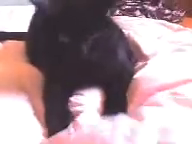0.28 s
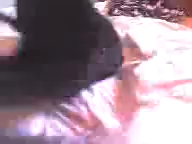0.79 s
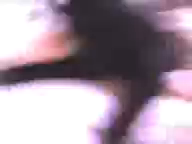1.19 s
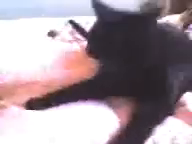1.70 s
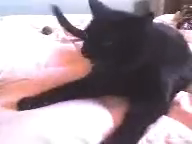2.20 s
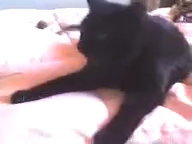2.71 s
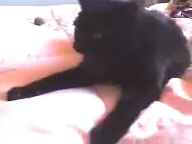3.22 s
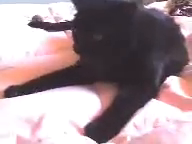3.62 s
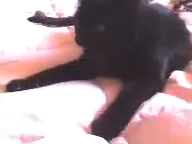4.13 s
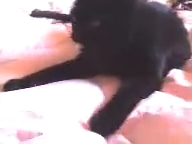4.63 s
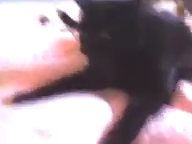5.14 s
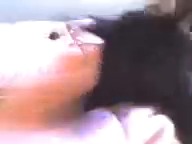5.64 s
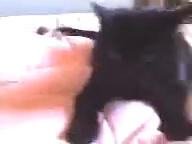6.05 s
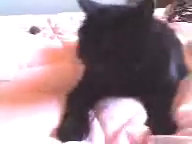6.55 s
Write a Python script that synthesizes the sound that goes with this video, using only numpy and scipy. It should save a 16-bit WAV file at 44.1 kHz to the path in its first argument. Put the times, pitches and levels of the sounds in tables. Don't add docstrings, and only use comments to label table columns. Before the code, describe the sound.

Quiet cat mutter, paw thumps on a bed, sudden harsh scream, claw snaps and hiss, then a long chest growl ending in a short yowl.

```python
import sys
import numpy as np
from scipy import signal
from scipy.fft import rfft, irfft
from scipy.io import wavfile
from scipy.ndimage import uniform_filter1d

SR = 44100
rng = np.random.default_rng(int(sys.argv[2]) if len(sys.argv) > 2 else 0)


def boost(x):
    u = np.asarray(x, float) / 20
    return 10 ** u


def digitize_waveform(pressure):
    field = np.atleast_2d(pressure).T
    bounded = np.clip(field, -1, 1)
    quanta = np.round(bounded * 32767).astype(np.int16)
    wavfile.write(sys.argv[1], SR, quanta)


N = 298557


def evened(x):
    return x / np.sqrt(np.mean(x ** 2) + 1e-20)


def smoothed(x, size):
    return uniform_filter1d(x, size=size)


def levelled(x, size=3000):
    power = smoothed(smoothed(x ** 2, size), size)
    return x / np.sqrt(abs(power) + 1e-12)


def colour(x, points):
    f, db = np.transpose(points)
    hz = np.fft.rfftfreq(len(x), 1 / SR)
    gain = boost(np.interp(np.log(hz + 1), np.log(f), db))
    return irfft(rfft(x) * gain, len(x))


def resonate(x, hz, width):
    turn = np.exp(2j * np.pi * np.cumsum(hz * np.ones(len(x))) / SR)
    r = np.exp(-np.pi * width / SR)
    smooth = signal.lfilter([(1 - r) ** 2], [1, -2 * r, r * r], x / turn + 1e-18)
    return 2 * (turn * smooth).real


def unfold(rows):
    s, *columns = np.transpose(rows)
    span = slice(max(round(s[0] * SR), 0), min(round(s[-1] * SR), N))
    t = np.arange(N)[span] / SR
    return span, t, [np.interp(t, s, c) for c in columns]


def by_jaw(table, jaw):
    opening, *columns = np.transpose(table)
    return [np.interp(jaw, opening, c) for c in columns]


# t/s, half length/s, added unevenness/1, added share of air/1
FOLD_STRAIN = [
    (1.075, .045, .09, .28),
    (1.16, .04, -.025, -.03),
    (3.45, .04, .2, .12),
    (3.7, .2, -.05, .02),
    (4.45, .2, .05, .03),
    (4.9, .15, .03, .02),
    (5.6, .07, .12, .06),
    (5.95, .05, .05, .45),
]


def vocal_folds(t, hz, folds, shimmer_db):
    s, half, *added = np.transpose(FOLD_STRAIN)
    moments = np.exp(-((t - s[:, None]) / half[:, None]) ** 4)
    uneven, air = np.array(folds)[:, None] + added @ moments
    wobble, strength, breath = rng.standard_normal((3, len(t)))
    drift = 1 + .012 * evened(smoothed(smoothed(strength, 2500), 2500))
    jitter = np.maximum(1 + uneven * evened(smoothed(wobble, 300)), .3)
    turns = np.cumsum(hz * drift * jitter) / SR
    closures = np.diff(np.floor(turns), prepend=0) > 0
    pulses = evened(closures * boost(shimmer_db * np.clip(strength, -1.6, 1.6)))
    puffs = evened((1.0 + np.exp(-(turns % 1) / .5)) * breath)
    slap = boost(1.2 * np.clip(evened(smoothed(breath, 200)), -2, 2))
    low = (1 - air) * pulses + .7 * air * puffs
    bright = (1 - air) * pulses * slap + 5.0 * air * puffs
    return low, bright, puffs


# f/Hz, level/dB
THROAT = [(440, -3), (520, -13), (680, -26), (1500, -44)]
# levels/dB (chest, first, second, third), tunings f/Hz (first, second, third)
TONGUE_LIFT = (-.5, -12, 8, -5.5), (-130, -57.5, 180)


def voice(rows, share, shape, folds, chest_hz, widths, top_db, spray_db, shimmer_db, lifts=TONGUE_LIFT):
    span, t, (effort_db, hz, jaw, tongue) = unfold(rows)
    levels = zip(by_jaw(share, jaw), lifts[0])
    chest_db, *mouth_db = (effort_db + c + lift * tongue for c, lift in levels)
    mouth_hz = [c + lift * tongue for c, lift in zip(by_jaw(shape, jaw), lifts[1])]
    low, bright, puffs = vocal_folds(t, hz, folds, shimmer_db)
    rings = [resonate(bright, f, width) for f, width in zip(mouth_hz, widths)]
    rings[2] += boost(top_db) * resonate(bright, 3275, 840)
    rings[2] += boost(spray_db) * resonate(puffs, 3600, 1500)
    sinking = np.linspace(*chest_hz, len(t)) + 39.8 * jaw
    chest = colour(resonate(low, sinking, 300), THROAT)
    chest = -np.roll(chest, 40)
    call = boost(chest_db) * levelled(chest)
    for k, (db, ring) in enumerate(zip(mouth_db, rings)):
        call -= (-1) ** k * boost(db) * levelled(ring)
    out = np.zeros(N)
    out[span] = call * signal.windows.tukey(len(t), 1200 / len(t))
    return out


CALM, CLEAR, AIRY, LOOSE = (.15, .3), (.05, .06), (.5, .85), (.11, .07)

# t/s, effort level/dB, pulse f/Hz, jaw opening/0-1, tongue raised/-1..1
MUTTER_CALL = [
    (0.0, -49, 95.64, 0.35, .2),
    (.22, -49, 96.1, 0.34, .1),
    (.36, -56.5, 95.7, .95, 1),
]
# jaw opening/0-1, chest level/dB, first, second, third mouth level/dB
LOW_LEVELS = [(0, 1, -33.5, -45.5, -44), (0.501, 1.5, -9.5, -16, -25), (1.001, -1, 9, -5, -2.5)]
# jaw opening/0-1, first, second, third resonance f/Hz
MUTTER_MOUTH = [(0, 950, 1530, 2560), (1, 935, 1590, 2560)]


def mutter():
    return voice(MUTTER_CALL, LOW_LEVELS, MUTTER_MOUTH, CALM, (320, 320), (300, 400, 500),
                 0, -30, shimmer_db=2.5)


# t/s, dull push level/dB, cloth scrape level/dB, half length/s
PAWS = [(0.107, -38.5, -74, .015), (0.403, -46, -42.5, 0.14), (0.619, -41.5, -48, 0.057),
        (.696, -40.5, -41.5, .035), (.795, -30.5, -30, .018), (0.83, -22, -26, .016),
        (0.894, -53, -49, 0.039), (0.972, -29, -37, .015), (1.191, -41, -26, 0.034),
        (1.306, -26.5, -24, 0.021), (1.376, -40, -34.5, .025), (1.505, -42.5, -40, 0.11),
        (1.635, -48.5, -44.5, 0.0092), (2.37, -44.5, -48, 0.089), (2.631, -42.5, -58.5, 0.013),
        (2.823, -38.5, -59, 0.01), (2.889, -63, -69, 0.036), (3.019, -56.5, -70, 0.033),
        (3.107, -56.5, -49, 0.013), (3.31, -65.5, -76, 0.033), (5.91, -38, -37, 0.042),
        (6.066, -71.5, -54.5, .025), (6.35, -66.5, -53.5, 0.013), (6.449, -52.5, -71.5, 0.027),
        (6.683, -63.5, -55, 0.036), (6.77, -56, -48, 0.041)]
# f/Hz, level/dB per Hz
CLOTH_COLOUR = [(500, 2), (900, 8.5), (1400, 7.5), (2000, 0), (2600, -1.5), (3400, -5.5)]
# f/Hz, level/dB per Hz
MATTRESS_COLOUR = [(30, 2.5), (150, 8), (200, -4.5), (330, 2), (480, -3), (700, -33.5)]


def bedding():
    clumps = boost(2.0 * evened(smoothed(rng.standard_normal(N), 250)))
    push = evened(colour(rng.standard_normal(N), MATTRESS_COLOUR))
    cloth = np.vstack(([(300, -28.5)], CLOTH_COLOUR))
    scrape = evened(colour(clumps * rng.standard_normal(N), cloth))
    s, push_db, scrape_db, half = np.transpose(PAWS)[:, :, None]
    t = np.arange(0, N, 32) / SR
    paw = boost(-5 * abs((t - s) / half) ** 2.2)

    def pressure(db):
        return np.interp(np.arange(N) / SR, t, np.linalg.norm(boost(db) * paw, axis=0))
    return pressure(push_db) * push + pressure(scrape_db) * scrape


# t/s, peak level/dB, ring f/Hz, t60/s
SNAPS = [
    (0.946, -36, 1100, 0.023),
    (1.297, -13.5, 1074, 0.045),
    (1.385, -21, 1730, 0.023),
    (1.448, -32, 2070, 0.022),
    (1.67, -17.5, 2650, 0.021),
    (1.685, -25, 1010, 0.0041),
    (2.361, -29, 1690, 0.016),
    (2.6, -38.5, 3200, 0.014),
    (3.093, -46, 3320, 0.034),
    (6.055, -41, 835, 0.018),
]


def ticks():
    out, t = np.zeros(N), np.arange(1500) / SR
    grits = rng.standard_normal((len(SNAPS), 1500))
    for (s, db, hz, t60), grit in zip(SNAPS, grits):
        snap = np.sin(2 * np.pi * hz * t) + 1.4 * evened(resonate(grit, hz, 800))
        snap *= boost(db - 2 - 60 * t / max(t60, .004))
        snap *= np.minimum(t / .002, 1)
        out[round(s * SR):][:1500] += snap
    return out


SCREAM_CALL = [
    (.95, -38.5, 146, .01, -0.14),
    (.974, -25.5, 152, 0.22, 0.52),
    (.996, -16, 155, 0.28, -0.19),
    (1.03, -17, 312, 0.59, 0.00011),
    (1.092, -5, 359, .98, -0.0048),
    (1.118, -11, 441, .95, -.2),
    (1.15, -14, 434, .5, -0.059),
    (1.178, -15, 427, .36, -0.82),
    (1.23, -52.5, 430, .2, .1),
]
# jaw opening/0-1, chest level/dB, first, second, third mouth level/dB
CRY_LEVELS = [(0, 3, -12, -22, -21.5), (.3, -15.5, -14, 0.9, -19.5), (.6, -28, -9.5, -2.5, -.5),
              (1, -40, -12, -14.5, 2.03)]
# jaw opening/0-1, first, second, third resonance f/Hz
CRY_MOUTH = [(0, 920, 1600, 2600), (.3, 930, 1640, 2350), (.6, 957, 1820, 2385), (1, 1060, 1840, 2616)]
# levels/dB (chest, first, second, third), tunings f/Hz (first, second, third)
CRY_LIFT = (9.5, -11, 1, -1.5), (33, 20, 300)


def scream():
    return voice(SCREAM_CALL, CRY_LEVELS, CRY_MOUTH, CLEAR, (325, 395), (260, 330, 480),
                 -24.5, -31.5, shimmer_db=3.5, lifts=CRY_LIFT)


WHIMPER_CALL = [
    (1.205, -39, 431, .22, 0.37),
    (1.222, -40, 431, .3, 0.33),
    (1.236, -38.5, 421, .3, 0.25),
    (1.25, -58, 422, .22, 0.085),
]


def whimper():
    return voice(WHIMPER_CALL, CRY_LEVELS, CRY_MOUTH, CLEAR, (390, 390), (200, 120, 300),
                 -21.5, -42.0, shimmer_db=1.05)


HISS_CALL = [
    (1.61, -58.5, 100.2, 0.86, 0.2),
    (1.674, -35, 99.6, 0.99, -.7),
    (1.706, -31.5, 101.7, .3, -0),
    (1.89, -38, 101.6, 0.12, -0.15),
    (2.05, -37.5, 98.1, 0.43, -0.1),
    (2.27, -39.5, 96.2, .85, -0.2),
    (2.35, -40.5, 101.9, 0.21, -0),
    (2.42, -55.5, 102.5, 0.15, .05),
]
# jaw opening/0-1, chest level/dB, first, second, third mouth level/dB
HISS_LEVELS = [(0, -1, -5, -14, -6), (1.001, -0.5, 1.5, 3, 1.5)]
# jaw opening/0-1, first, second, third resonance f/Hz
HISS_MOUTH = [(0, 934, 1780, 2700), (1, 991, 1880, 2945)]


def hiss():
    return voice(HISS_CALL, HISS_LEVELS, HISS_MOUTH, AIRY, (340, 330), (330, 500, 450),
                 -1.2, -16.5, shimmer_db=-7.5)


GROWL_START = [
    (3.255, -52.5, 93.5, .1, 0.057),
    (3.32, -38.5, 105.4, .15, 0.054),
    (3.44, -33, 110.5, 0.14, .05),
    (3.5, -33.5, 113.6, .02, .05),
]
FIRST_SWELL_CALL = [
    (3.535, -34, 159.9, .2, .02),
    (3.58, -33, 166, 0.54, .02),
    (3.65, -34, 168.5, 0.71, 0.017),
    (3.75, -35.5, 199.5, 0.95, .02),
    (3.88, -34, 169.4, 0.95, 0.072),
    (3.915, -34, 132.9, 1, 0.23),
    (3.955, -28.5, 137, 1, 1),
    (4.15, -31.5, 119.3, .8, 0.51),
    (4.26, -38, 102.4, 0.87, 0.66),
]
# jaw opening/0-1, chest level/dB, first, second, third mouth level/dB
SWELL_LEVELS = [(0, 0.0034, -28, -44.5, -47), (.5, 0.0082, -11.5, -29, -18), (1, 0, 12, -9, 0.5)]
# jaw opening/0-1, first, second, third resonance f/Hz
SWELL_MOUTH = [(0, 660, 1150, 1880), (.5, 700, 1120, 1855), (0.999, 1040, 1300, 1790)]
# levels/dB (chest, first, second, third), tunings f/Hz (first, second, third)
SWELL_LIFT = (-.5, -25, 4.5, -33.5), (-180, -19, -300)


def first_swell():
    growl = np.vstack((GROWL_START, FIRST_SWELL_CALL))
    return voice(growl, SWELL_LEVELS, SWELL_MOUTH, LOOSE, (370, 320), (215, 320, 320),
                 -29.5, -41, shimmer_db=0.5, lifts=SWELL_LIFT)


SECOND_SWELL_CALL = [
    (4.24, -33, 107.5, 0.58, 0.59),
    (4.42, -33, 112.6, 0.84, -0.34),
    (4.52, -31.5, 111.9, 0.81, .85),
    (4.86, -31, 111.2, 0.83, .85),
    (5.02, -32.5, 101.4, 0.69, 0.79),
    (5.27, -35, 109.1, 0.45, 0.006),
    (5.63, -39.5, 97.2, .45, .05),
    (5.71, -33, 114, 0.68, -0.21),
    (5.805, -35.5, 125.3, 0.81, -0.63),
]
# jaw opening/0-1, first, second, third resonance f/Hz
LOW_MOUTH = [(0, 850, 1240, 1650), (.5, 865, 1228, 1670), (1.001, 970, 1190, 1850)]


def second_swell():
    return voice(SECOND_SWELL_CALL, LOW_LEVELS, LOW_MOUTH, LOOSE, (350, 245), (215, 320, 480),
                 -13.5, -30, shimmer_db=1.5)


YOWL_CALL = [
    (5.78, -33, 192.5, 0.025, 0.36),
    (5.81, -30, 244.5, .4, .05),
    (5.83, -17, 289.7, 0.63, -0.58),
    (5.858, -16, 306.2, 1, 0.014),
    (5.894, -27, 308.3, .98, -0.003),
    (5.94, -57.5, 298.7, 0.86, -.8),
]
# jaw opening/0-1, chest level/dB, first, second, third mouth level/dB
YOWL_LEVELS = [(0, -6, -1, -14, -20.5), (0.399, -18.5, -3.5, 1, 1), (1, -16.5, -15, 2, -5.5)]
# jaw opening/0-1, first, second, third resonance f/Hz
YOWL_MOUTH = [(0, 952, 1396, 1700), (.4, 820, 1126, 1850), (1, 890, 1600, 2480)]


def yowl():
    return voice(YOWL_CALL, YOWL_LEVELS, YOWL_MOUTH, CLEAR, (330, 315), (420, 280, 420),
                 -37.0, -38, shimmer_db=1.1)


# t/s, gain level/dB, length/s
BREATH_SURGES = [
    (1.0603, 9, .002),
    (1.052, 1.5, .004),
    (1.07, -2.5, .006),
    (1.0838, 3, .002),
    (1.092, 2.5, .002),
    (1.105, -3, .009),
    (1.152, 2.5, .014),
    (1.203, -8, .0068),
    (1.633, 7, .011),
    (3.443, 3, .024),
]


def breath_surges():
    t = np.arange(N) / SR
    return boost(sum(db * np.exp(-((t - s) / length) ** 2) for s, db, length in BREATH_SURGES))


def room(x):
    t = np.arange(6000) / SR
    echoes = rng.choice([-1., 1.], 6000) * (rng.random(6000) < .05)
    tail = echoes * (t > .003) * boost(-60 * t / 0.13)
    return signal.oaconvolve(x, tail / np.linalg.norm(tail))[:N]


def scene():
    cat = mutter() + scream() + whimper() + hiss() + first_swell() + second_swell() + yowl()
    near = cat * breath_surges() + bedding() + ticks()
    return (near + boost(-15) * room(near))[None]


# f/Hz, level/dB
MIC_BAND = [(20, -38), (165, -20.5), (200, 1.5), (430, 1), (500, -2), (640, -1), (740, -0.5), (1000, -3),
            (3300, -2.5), (3550, -16), (3900, -18), (4400, -37), (4900, -85.5)]


def microphone(x):
    squash = 1.145
    return colour(squash * np.tanh(x / squash), MIC_BAND)


# f/Hz, level/dB per Hz
HASH_COLOUR = [(20, -22.5), (70, -4.5), (170, -0.5), (400, -10.5), (700, -16.5), (3400, -23), (4000, -40.5),
               (4600, -70.5)]


def following_hash(level):
    return boost(-19) * level * evened(colour(rng.standard_normal(N), HASH_COLOUR))


# f/Hz, level/dB
HUM_COLOUR = [(12, -67), (20, -34.5), (125, -14.5), (185, -10.5), (233, -4.5), (313, 1), (368, -1),
              (507, -10.5), (624, -10.5), (1010, -13.5), (1790, -14), (2200, -18.5), (3180, -17.5),
              (3400, -24.5), (4800, -59), (6240, -99.5), (10600, -120)]


def self_noise(level):
    _, _, z = signal.stft(rng.standard_normal(N), SR, nperseg=512)
    patches = uniform_filter1d(rng.standard_normal(z.shape), size=5, axis=0)
    patches = uniform_filter1d(patches, size=8, axis=1)
    noise = signal.istft(z * boost(3.0 * evened(patches)), SR, nperseg=512)[1][:N]
    over_db = np.clip(20 * np.log10(smoothed(level, 3000) + 1e-9) + 52, 0, 20)
    return boost(-54 - 0.076 * over_db) * evened(colour(noise, HUM_COLOUR))


def band_limit(x):
    return signal.sosfilt(signal.butter(12, 15750, fs=SR, output="sos"), x)


def record(dry):
    x = microphone(dry[0])
    level = np.sqrt(abs(smoothed(resonate(x, 690, 990) ** 2, 400)))
    x = x + following_hash(level) + self_noise(level)
    ceiling = .735
    mix = np.clip(x, -ceiling, ceiling)[None]
    return band_limit(mix)


dry = scene()
out = record(dry)
digitize_waveform(out)
```